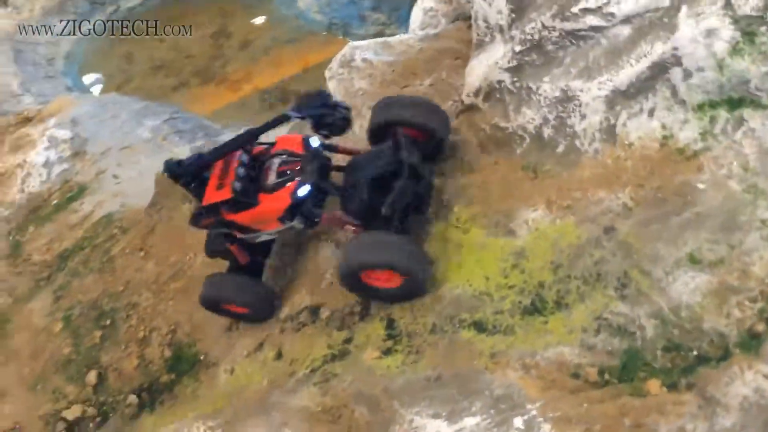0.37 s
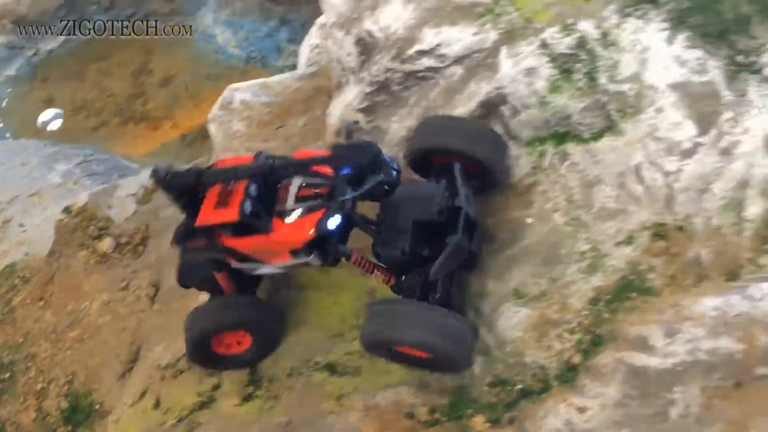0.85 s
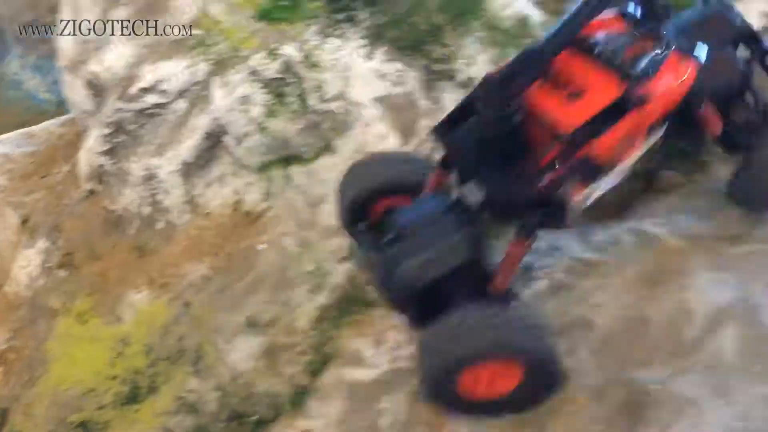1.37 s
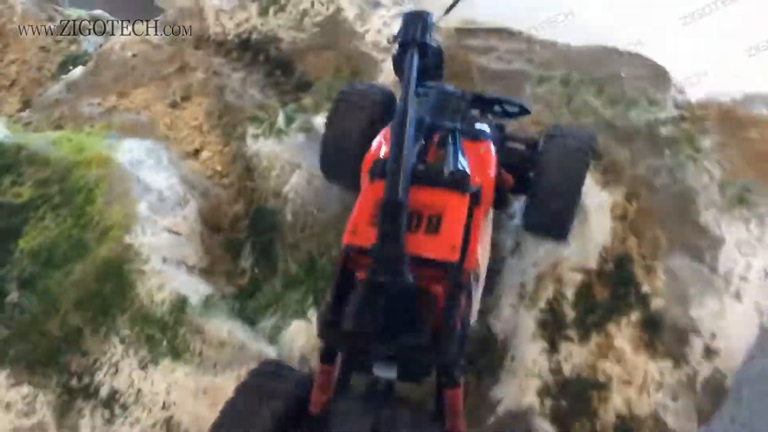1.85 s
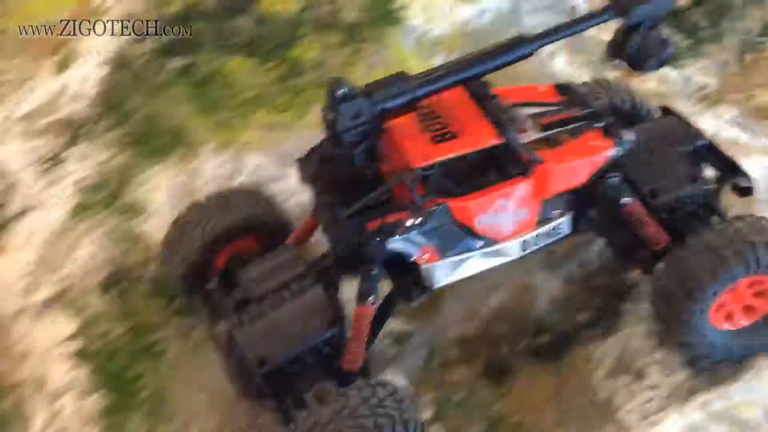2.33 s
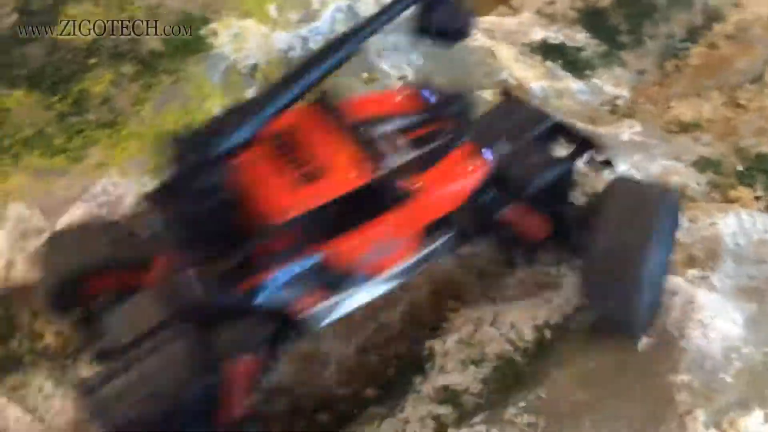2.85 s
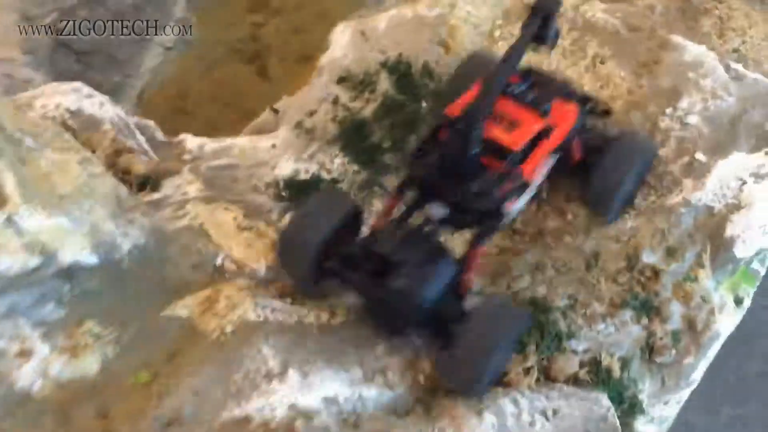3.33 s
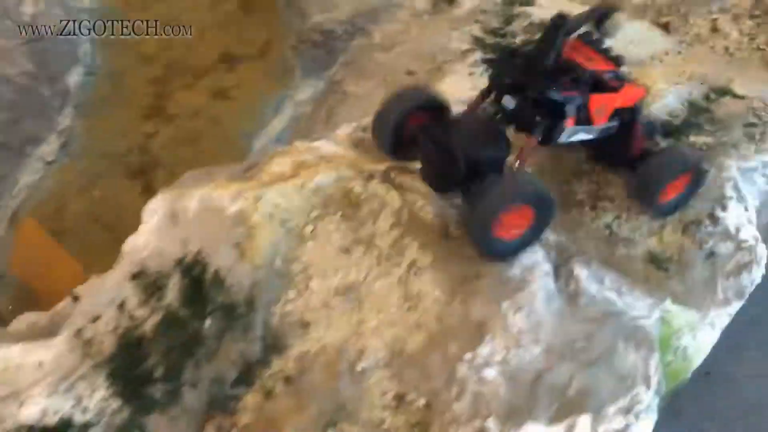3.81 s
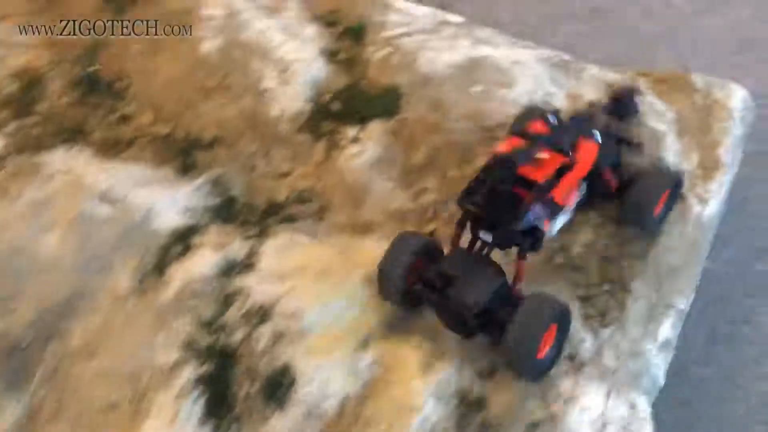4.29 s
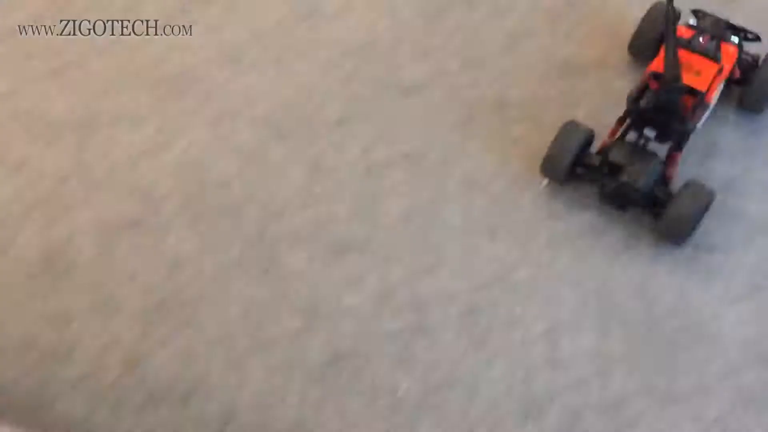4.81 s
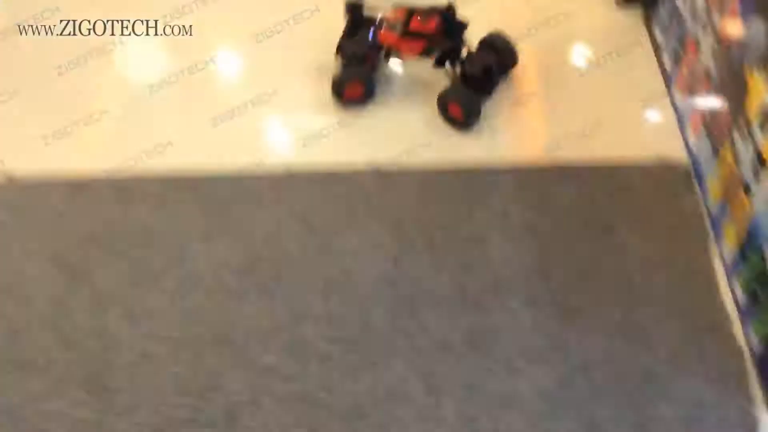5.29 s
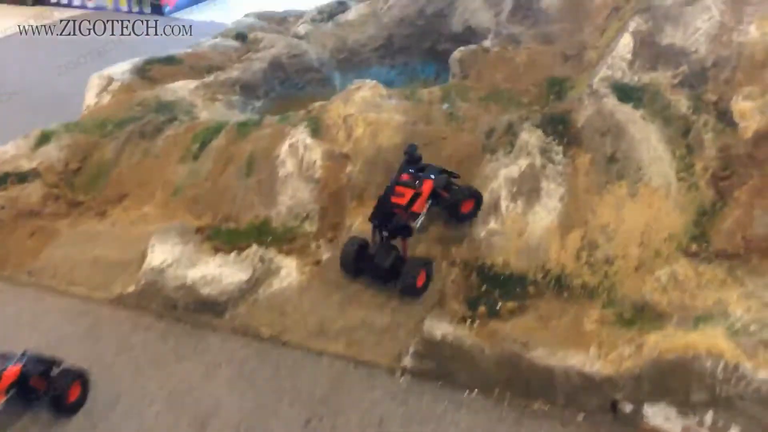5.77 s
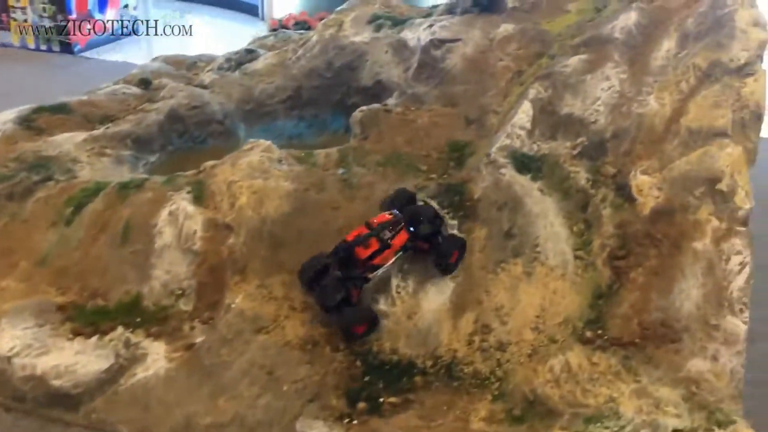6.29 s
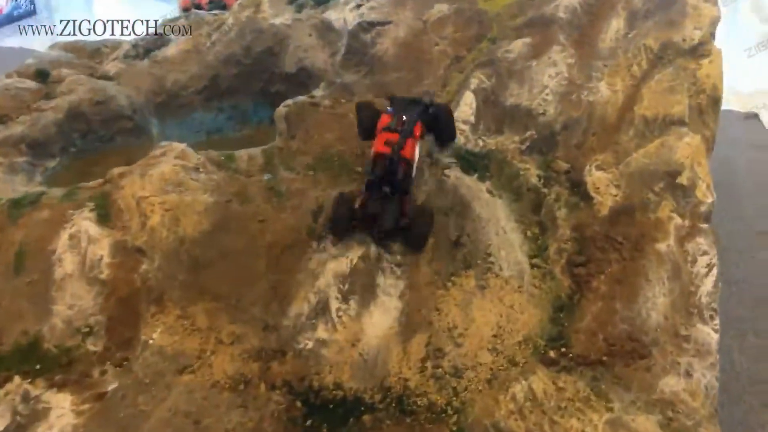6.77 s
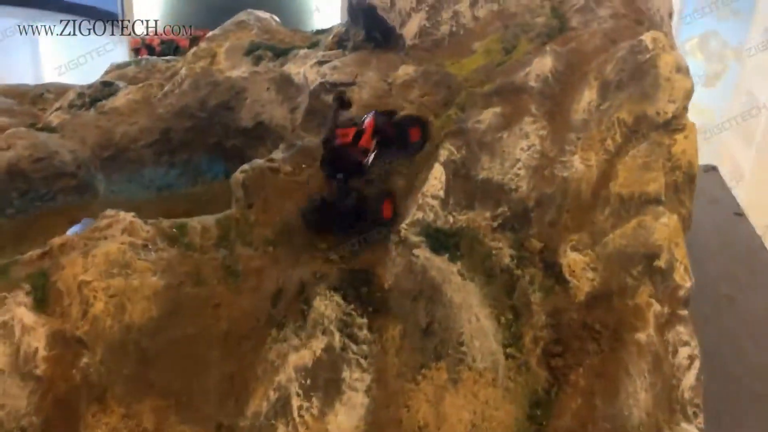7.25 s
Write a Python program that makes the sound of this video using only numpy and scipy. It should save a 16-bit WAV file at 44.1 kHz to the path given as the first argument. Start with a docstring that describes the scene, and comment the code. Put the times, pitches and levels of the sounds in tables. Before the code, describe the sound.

A toy vehicle's geared motor grinds and chirps in uneven spurts, heard close indoors with slight room reverberation. Knobbly tyres patter, thud and clack against a hollow plastic-like shell, busiest in the middle. One sharp, heavy bang lands past halfway, then the wheels hum across the floor, a tiny dropout passes, and gears whine upward again over faint air noise.

```python
"""Indoors, close to a phone, a small toy crawler climbs a hollow model rock.
Plastic gears rattle as filtered random impacts and sing in short tones gliding at the tooth rate.
Knobbly tyres rumble and knock, exciting damped resonances of the hollow shell and the chassis.
A diffuse room tail and a faint noise of air lie behind; the level dips once for a moment."""
import sys
import numpy as np
from scipy import signal
from scipy.fft import rfft, irfft
from scipy.io import wavfile
from scipy.ndimage import uniform_filter1d

SR = 44100
rng = np.random.default_rng(int(sys.argv[2]) if len(sys.argv) > 2 else 0)


def voltage_ratio(decibels):
    """Convert decibels (scalar or array-like) to amplitude ratios, 20 dB per decade."""
    exponent = np.asarray(decibels, float) / 20
    return 10 ** exponent


def wav_out(sig):
    """Save sig, one row per channel (or a flat mono array), as 16-bit PCM at SR to the path in sys.argv[1]."""
    wavfile.write(sys.argv[1], SR, np.round(np.clip(np.atleast_2d(sig).T, -1, 1) * 32767).astype(np.int16))


N = 325325

# harmonics of a tooth-rate tone: multiple, relative_db
OVERTONES = [(1, 0), (2, -2), (3, -2)]
# resonances of the hollow shell: centre_hz, width_hz, relative_db
SHELL_MODES = [(170, 85, -5), (222.5, 42, 3), (314, 146, -2)]
# resonances of the chassis: centre_hz, width_hz, relative_db
CHASSIS_MODES = [(413, 113, -7), (540, 108, 3), (707, 320, 1.5), (884, 150, 4), (1235, 650, -6)]


def level(x, db):
    """Normalisation: scales a signal to a given rms level."""
    return x * voltage_ratio(db) / np.sqrt(np.mean(x ** 2))


def colour(x, points):
    """Minimum-phase filtering: a folded cepstrum makes a causal filter from (Hz, dB) points."""
    hz, db = np.transpose(points)
    bin_hz = np.arange(1025) * SR / 2048
    log_gain = np.interp(np.log(bin_hz + 1), np.log(hz), db) * np.log(10) / 20
    cepstrum = irfft(log_gain)
    cepstrum[1:1024] *= 2
    cepstrum[1025:] = 0
    impulse = irfft(np.exp(rfft(cepstrum)))
    return signal.fftconvolve(x, impulse)[:len(x)]


def ring(x, modes):
    """Modal superposition: damped resonances in parallel, with alternating sign."""
    out = 0
    for k, (hz, width_hz, db) in enumerate(modes):
        resonator = signal.iirpeak(hz, hz / width_hz, SR)
        out = out + (-1) ** k * voltage_ratio(db) * signal.lfilter(*resonator, x)
    return out


def walk(rate_hz):
    """Band-limited fluctuation: held random levels, smoothed twice, with a spread near 1."""
    hold = int(SR / rate_hz)
    steps = np.repeat(rng.standard_normal(N // hold + 1), hold)
    return 1.3 * uniform_filter1d(uniform_filter1d(steps, hold), hold)[:N]


def grains(rate_hz, spread_db):
    """Shot noise: random tiny impacts, a few much harder than the rest."""
    hit = rng.random(N) < rate_hz / SR
    return hit * rng.standard_normal(N) * voltage_ratio(spread_db * rng.exponential(size=N))


def gears(box_db, pinion_db, hiss_db):
    """Impact excitation: loose teeth tick and rasp, brushes hiss, and the same jolts shake all."""
    # spectra of housing, pinion, rasp and brushes: frequency_hz, relative_db
    box_curve = [(250, -73.5), (560, -24), (900, -8), (1300, -5.5), (1470, -3), (1990, 0.5), (2700, -5),
                 (3510, -33), (5940, -120)]
    pinion_curve = [(700, -64), (1590, -29), (2700, 1), (3580, -1), (4920, -9), (5460, -10), (8000, -25),
                    (10400, -28), (17600, -120)]
    rasp_curve = [(3500, -30), (5000, -5), (5700, 0), (7000, -2), (8500, -6), (10500, -26)]
    hiss_curve = [(500, -50), (2000, -14), (4120, 1.5), (7000, 0.5), (7750, -1.5), (12800, -3), (14900, -6),
                  (15700, -6.5)]
    # swelling and fading of the gritty rasp: time_s, db_over_pinion_ticks
    rasp_swell = [(0, -16), (2.3, -20), (2.5, 0), (2.65, -2.5), (2.8, -10), (4.4, -14), (5.3, -29),
                  (6.15, -12), (6.3, -27), (6.72, -18), (6.85, -31), (7.38, -15)]

    jolt_db = 0.5 * walk(30) + 2.0 * walk(110)
    ticks = grains(9000, 0.98)
    box_chirps = voltage_ratio(-5.5) * chirps(count=450, low_hz=1099.0, high_hz=2739)
    box = level(colour(ticks, box_curve), 0) + box_chirps
    pinion_chirps = voltage_ratio(-7.0) * chirps(count=900, low_hz=2700, high_hz=6516)
    rasp_db = np.interp(np.arange(N) / SR, *np.transpose(rasp_swell)) + walk(40)
    rasp = level(colour(grains(5000, 1.3), rasp_curve), 0) * voltage_ratio(rasp_db)
    pinion = level(colour(ticks, pinion_curve), 0) + pinion_chirps + rasp
    hiss = level(colour(grains(12000, 0.93), hiss_curve), 0) * voltage_ratio(1.03 * walk(27))
    rattle = box * voltage_ratio(box_db - 5.0) + pinion * voltage_ratio(pinion_db - 1.5)
    return voltage_ratio(jolt_db) * (rattle + hiss * voltage_ratio(hiss_db + 3.0))


def chirps(count, low_hz, high_hz):
    """Frequency modulation: loose gear pairs catch briefly, giving short, mostly falling tones."""
    out = np.zeros(N + SR)
    for when, pitch, length, bend in rng.random((count, 4)):
        u = np.linspace(0, 1, int((0.01 + 0.022 * length) * SR))
        start_hz = low_hz * (high_hz / low_hz) ** pitch
        hz = start_hz * (1 + (0.355 * bend - .25) * u)
        i = int(when * N)
        out[i:i + len(u)] += np.sin(np.pi * u) * np.sin(2 * np.pi * np.cumsum(hz) / SR)
    return level(out[:N], 0)


def whine():
    """Source and filter: gear glides, tread hum and a steady tone pass through the housing."""
    # what the case lets out: frequency_hz, gain_db
    housing = [(2800, 0), (3750, 0), (4800, -10), (5500, -1), (6400, -14)]
    wobble = .01 * walk(80) + .015 * walk(200)
    # complex noise frays each harmonic, faster for the higher ones
    rough = np.array([.36 * (walk(170 * k ** 2) + 1j * walk(170 * k ** 2)) for k, _ in OVERTONES])
    tones = gear_glides(wobble, rough) + tread_hum(wobble, rough) + strain_tone(wobble, rough)
    return colour(tones, housing)


def gear_glides(wobble, rough):
    """Tooth-meshing frequency: pitch rises as a motor spins up and falls as it loads."""
    # glides, levels ahead of the housing: start_s, length_s, from_hz, to_hz, level_db
    glides = [(0.087, 0.062, 800, 1240, -26.5), (0.137, 0.042, 1146, 1360, -26),
              (0.532, 0.08, 2310, 2350, -31), (0.274, 0.018, 2660, 2250, -25),
              (0.342, 0.03, 1850, 2150, -34), (0.105, 0.074, 1750, 2080, -26),
              (0.163, 0.022, 2110, 2100, -27), (0.189, 0.017, 2060, 1860, -23.5),
              (0.201, 0.03, 2064, 1500, -23), (0.252, 0.051, 1820, 992, -27.5),
              (0.268, 0.023, 2280, 1880, -30), (0.313, 0.029, 2400, 1840, -22.5),
              (0.371, 0.044, 2175, 1960, -20.5), (0.409, 0.023, 1995, 2040, -27),
              (0.464, 0.022, 1834, 1290, -22.5), (0.497, 0.038, 2415, 2023, -22),
              (0.534, 0.027, 1500, 1280, -24), (0.601, 0.021, 2334, 1500, -21.5),
              (0.65, 0.03, 1644, 1000, -26), (0.695, 0.034, 2450, 2036, -19.5),
              (0.728, 0.04, 2040, 2210, -32), (0.814, 0.038, 1884, 1540, -30),
              (0.851, 0.022, 1500, 1680, -24), (0.877, 0.046, 1640, 1430, -31),
              (0.865, 0.04, 2260, 1850, -28), (0.93, 0.064, 1860, 1803, -17.5),
              (1.022, 0.05, 2150, 2030, -24.5), (1.064, 0.03, 1720, 1525, -26),
              (1.122, 0.041, 2230, 2370, -27), (1.167, 0.029, 1730, 1520, -27),
              (1.253, 0.056, 1880, 2105, -23), (1.333, 0.036, 2590, 2480, -26.5),
              (1.372, 0.027, 2540, 2050, -28), (1.818, 0.042, 700, 1005, -39),
              (1.886, 0.029, 1160, 1400, -25), (1.901, 0.037, 1677, 1677, -20.5),
              (1.956, 0.024, 2060, 1675, -22.5), (2.394, 0.016, 1670, 1710, -26),
              (2.373, 0.023, 3300, 3180, -33), (2.713, 0.018, 2025, 2200, -26.5),
              (2.725, 0.015, 1040, 1310, -24.5), (2.736, 0.017, 1556, 1390, -23),
              (2.752, 0.02, 1300, 1086, -26), (2.741, 0.036, 3030, 2220, -23),
              (2.88, 0.021, 2040, 2130, -24.5), (3.217, 0.017, 2010, 2110, -24.5),
              (3.665, 0.032, 2000, 1800, -31), (3.571, 0.047, 1263, 1332, -24),
              (3.609, 0.025, 1360, 1800, -23.5), (3.626, 0.038, 1790, 1890, -22),
              (4.063, 0.04, 1393, 1337, -29), (4.171, 0.051, 1740, 1900, -29.5),
              (4.212, 0.048, 2150, 2530, -22), (5.2, 0.023, 3600, 3600, -27),
              (5.226, 0.039, 3820, 3570, -27), (5.308, 0.083, 1433, 2200, -29),
              (5.386, 0.056, 2130, 2230, -24.5), (5.431, 0.049, 2350, 2550, -23.5),
              (5.468, 0.039, 2580, 3100, -29), (5.519, 0.06, 3130, 3020, -32),
              (5.551, 0.019, 2324, 1850, -22), (5.568, 0.022, 1860, 2320, -23),
              (5.621, 0.044, 2860, 2640, -32.5), (5.671, 0.016, 2350, 2200, -27),
              (5.739, 0.026, 3110, 2500, -26.5), (5.754, 0.019, 1936, 1760, -25),
              (5.77, 0.033, 1780, 2240, -29), (5.8, 0.032, 2170, 2400, -27),
              (5.833, 0.036, 2220, 1796, -27), (5.889, 0.032, 1570, 1250, -32.5),
              (5.921, 0.013, 1990, 1700, -32), (2.232, 0.022, 2040, 1850, -31.5),
              (6.167, 0.035, 1164, 1350, -30.5), (6.168, 0.025, 1570, 1495, -27.5),
              (6.193, .014, 2170, 2080, -30), (6.213, 0.023, 3760, 3800, -29),
              (6.222, .016, 1850, 1730, -26), (4.422, 0.032, 3400, 3680, -32),
              (6.242, 0.033, 1147, 1870, -27.5), (6.27, 0.049, 1900, 1670, -23.5),
              (6.315, 0.042, 1714, 1890, -21), (6.36, 0.071, 1923, 1864, -21),
              (6.429, 0.067, 1880, 1920, -35), (6.463, 0.05, 2730, 2660, -28),
              (6.534, 0.025, 3150, 2650, -22), (6.553, 0.02, 2540, 2340, -20.5),
              (6.576, 0.028, 2510, 2440, -22.5), (6.57, 0.035, 2850, 3020, -28),
              (6.593, 0.025, 1855, 1820, -22), (6.629, 0.024, 2170, 2020, -21),
              (6.648, 0.022, 2040, 2240, -22), (6.671, 0.045, 1920, 1836, -20.5),
              (6.28, 0.024, 820, 964, -26.5), (7.256, 0.031, 800, 1050, -29),
              (6.885, 0.017, 1285, 1150, -27), (6.922, 0.02, 664, 630, -28), (6.965, 0.03, 1390, 1500, -31),
              (6.986, 0.064, 1219, 1578, -23.5), (7.026, 0.046, 1520, 1980, -27),
              (7.084, 0.046, 2430, 2650, -30), (7.123, 0.033, 2660, 2140, -25.5),
              (7.063, 0.047, 1890, 2055, -28), (7.161, 0.042, 2330, 2710, -27),
              (7.185, 0.043, 2420, 2330, -26.5), (7.24, 0.042, 3000, 3170, -27.5)]
    db_per_octave = 2  # faster teeth sing louder
    out = np.zeros(N)
    for start, length, from_hz, to_hz, db in glides:
        # a loaded motor drops fast, then settles
        halfway = .62 if to_hz < from_hz else .5
        half_hz = from_hz + (to_hz - from_hz) * halfway
        # a freely climbing pitch keeps half of the wobble and fraying
        loose = .5 if to_hz > 1.1 * from_hz else 1
        swing_db = db_per_octave * np.log2(to_hz / from_hz) / 2
        times = start + length * np.array([0, .5, 1])
        levels_db = [db - swing_db, db, db + swing_db]
        out += sing(times, [from_hz, half_hz, to_hz], levels_db, loose * wobble, loose * rough)
    return out


def tread_hum(wobble, rough):
    """Periodic contact: tread knobs hum over the flat floor at their passing rate."""
    # rolling hum, levels ahead of the housing: time_s, knob_rate_hz, level_db
    roll = [(4.535, 540, -37), (4.63, 560, -33.5), (4.72, 540, -37), (4.772, 500, -57), (4.949, 420, -46),
            (5.101, 430, -42), (5.27, 504, -43)]
    return sing(*np.transpose(roll), 3 * wobble, 2 * rough)


def strain_tone(wobble, rough):
    """Near-constant periodicity: a thin steady tone, perhaps the motor straining on the rock."""
    # steady tones, levels ahead of the housing: start_s, end_s, pitch_hz, level_db
    strains = [(6.004, 6.193, 2930, -39.5), (7.331, 7.37, 2930, -32)]
    out = np.zeros(N)
    for start, end, hz, db in strains:
        out += sing([start, end], [hz, hz], [db, db], .1 * wobble, .3 * rough)
    return out


def sing(s, hz, db, wobble, rough):
    """Amplitude and phase modulation: speed wobbles, an off-centre pinion throbs, wear frays."""
    pinion_teeth, fade_s = 9, 0.0032
    i = np.arange(int(s[0] * SR), min(int(s[-1] * SR), N))
    phase = 2 * np.pi * np.cumsum(np.interp(i / SR, s, hz) * (1 + wobble[i])) / SR
    fade = np.clip(np.minimum(i - i[0], i[-1] - i) / SR / fade_s, 0, 1)
    throb = 1 + .3 * np.cos(phase / pinion_teeth)  # once a turn
    tone = 0
    for k, over_db in OVERTONES:
        frayed = 1 / k ** 3 + rough[k - 1, i]
        tone = tone + voltage_ratio(over_db) * np.real(frayed * np.exp(1j * k * phase))
    out = np.zeros(N)
    out[i] = voltage_ratio(np.interp(i / SR, s, db)) * fade * throb * tone
    return out


def tyres(boom_db, rumble_db, patter_db):
    """Forced resonance: tread knobs drum the ground and shell and patter through the chassis."""
    # resonances of the ground: centre_hz, width_hz, relative_db
    ground = [(50, 34, -10.5), (90, 33, -1), (138.5, 43, 0)]
    knobs = grains(700, 1.2) * voltage_ratio(1.9 * walk(25))
    small_knobs = grains(1500, 1.73) * voltage_ratio(2.0 * walk(25))
    # a second, broad resonance shapes each layer
    boom = ring(ring(knobs, ground), [(98, 360, 0)])
    rumble = ring(ring(knobs, SHELL_MODES), [(221, 215, 0)])
    patter = ring(ring(small_knobs, CHASSIS_MODES), [(766, 2200, 0)])
    drumming = level(boom, 0) * voltage_ratio(boom_db) + level(rumble, 0) * voltage_ratio(rumble_db)
    return drumming + level(patter, 0) * voltage_ratio(patter_db)


def knocks():
    """Contact stiffness: a hard blow cracks, a middling one chatters, a soft one rings the shell."""
    # tyres and chassis striking the shell:
    # time_s, relative_force_db, hardness (0 rubber, 1 plastic edge), tyre_bounce_hz
    strikes = [(0.457, -14.5, 0.85, 203), (0.703, -14.5, 0.51, 268), (1.333, -10.5, 0.9, 390),
               (1.413, -22.5, 0.51, 266), (1.509, -22, 0.45, 270), (1.778, -58, 0.93, 102),
               (1.817, -37, 0.83, 215), (1.937, -15, 1, 382), (2.013, -23, 0.51, 314),
               (2.18, -26, 0.34, 345), (2.324, -24, 0.99, 200), (2.372, -27, 0.94, 205),
               (2.419, -23, 0.94, 200), (2.422, -28, 0.18, 155), (2.658, -22, 0.56, 153),
               (2.72, -22.5, 0.32, 178), (2.859, -8, 0.3, 606), (2.864, -11, 0.11, 153),
               (2.891, -23.5, 0.01, 170), (2.915, -17, 0.19, 240), (2.938, -21.5, 0.12, 170),
               (2.981, -12, 0.66, 347), (2.989, -15, 0.71, 347), (3.028, -17.5, 1, 200),
               (3.116, -10.5, 0.93, 200), (3.272, -23, 0.48, 177), (3.336, -19.5, 0.58, 210),
               (3.578, -41, 1, 366), (3.693, -31, 0, 238), (3.775, -15, 0.35, 76), (3.807, -14, 0.83, 202),
               (3.889, -10, 0.89, 258), (3.966, -10, 0.72, 75.4), (3.988, -15.5, 0.73, 200),
               (4.014, -16, 0.89, 200), (4.347, -11, 0.92, 200), (4.356, -16.5, 0.098, 270),
               (4.357, -11.5, 0.76, 278), (4.363, -6, 0.92, 200), (4.369, -20.5, 0.22, 239),
               (4.387, -22.5, .5, 300), (4.509, -15, 0.93, 400), (4.518, -15, 0.11, 257),
               (4.518, -10.5, 0.11, 516), (4.514, 4, 0.95, 232), (4.528, -12, 0.64, 399),
               (4.546, -30, 0.13, 500), (4.648, -10.5, 0.66, 145), (4.663, -13, 1, 186),
               (4.715, -12.5, 0.84, 316), (4.972, -23, 0.32, 202), (5.922, -29, 0.008, 200),
               (5.99, -36, 0, 104), (6.08, -29.5, 0.011, 158), (6.171, -25.5, 0.18, 149),
               (6.203, -28, 0.096, 152), (6.428, -25.5, 0.16, 151), (6.468, -21, 0.16, 332),
               (6.55, -20, 0.67, 129), (6.648, -34, .5, 300), (6.704, -29, 0.073, 287),
               (6.891, -11.5, 0.87, 110)]
    # spectrum of cracking plastic: frequency_hz, relative_db
    crack_curve = [(710, -14), (1200, -1.5), (2130, -5.5), (2450, 1.5), (3660, -1.5), (4960, -13),
                   (7570, -15), (16000, -26)]
    contact_db = 36  # each part fades by this much a unit of hardness away from its own
    t = np.arange(int(.08 * SR)) / SR
    out = np.zeros(N + len(t))
    noises = rng.standard_normal((len(strikes), 2, len(t)))
    for (s, force_db, hard, bounce_hz), noise in zip(strikes, noises):
        mismatch = abs(np.clip(hard, 0, 1) - np.array([0, .5, 1]))
        thud_db, clack_db, crack_db = force_db - contact_db * mismatch
        bounce = np.sin(2 * np.pi * bounce_hz * t) * t * np.exp(-t * bounce_hz / 0.38)
        thud = bounce + voltage_ratio(11) * ring(bounce, SHELL_MODES)
        clack = ring(t * np.exp(-t / 0.0041) * noise[0], CHASSIS_MODES)
        # more forceful blows crack for longer
        decay_s = 0.0012 + 0.004 * voltage_ratio(force_db)
        crack_envelope = (1 - np.exp(-t / 0.00054)) * np.exp(-t / decay_s)
        crack = colour(crack_envelope * noise[1], crack_curve)
        blow = level(thud, thud_db - 5.5) + level(clack, clack_db - 11.5) + level(crack, crack_db - 20.0)
        out[int(s * SR):int(s * SR) + len(t)] += blow
    return out[:N]


def controls(t):
    """Common drive: the strongest stretch of throttle rules each layer; ground and lurches add."""
    # steady throttle: up_to_speed_s, throttle_off_s, start_rattle_db, end_rattle_db, brightness_db
    runs = [(0.001, 0.186, -34.5, -26, -2.5), (0.2, 0.93, -29.5, -28, 0.5), (0.902, 1.384, -30, -29.5, 3),
            (1.397, 1.566, -32.5, -32.5, 0), (1.783, 1.81, -50, -46, -23), (1.821, 1.859, -36.5, -28, -18),
            (1.874, 1.967, -32.5, -32.5, 2), (2.038, 2.2, -32, -39, -1), (2.21, 2.287, -35.5, -39, -18),
            (2.324, 2.37, -34.5, -43, 1.5), (2.369, 2.698, -35, -33, 4), (2.708, 3.07, -28, -36.5, 0.5),
            (3.075, 3.386, -33, -34, 1), (3.406, 3.508, -37.5, -39, -17), (3.583, 3.891, -31.5, -34, 0.5),
            (3.954, 4.148, -40.5, -33.5, -1.5), (4.18, 4.425, -31, -32.5, 1.5),
            (4.443, 4.626, -32.5, -37.5, 0.5), (4.639, 4.995, -33, -33.5, 0),
            (4.992, 5.265, -34.5, -30.5, 2), (5.322, 5.862, -31.5, -33, -0.5),
            (5.888, 6.15, -35.5, -36.5, -0.5), (6.156, 6.36, -32, -28, -2.5),
            (6.33, 6.722, -30, -30.5, 0.5), (6.746, 6.896, -32, -42, -4.5), (6.87, 7.072, -36.5, -28.5, -4),
            (7.112, 7.38, -29.5, -33.5, 0.5)]
    # how each layer follows the motor:
    # db_over_rattle, db_lost_per_db_of_lost_speed, db_gained_per_db_of_brightness
    follow = {"box": (2.1, 0.82, -0.22), "pinion": (0.05, 0.88, 0.064), "hiss": (-10, 1.03, 1.59),
              "boom": (-15.5, 0.39, -0.077), "rumble": (-11, 0.95, 0.059), "patter": (-7, 0.63, -0.18)}
    # ground under the wheels: time_s, tread_bite_db, hollowness_db
    surface = [(0.0, -2, 10), (0.7, 3.5, -0.5), (1.1, 3.5, 0), (1.5, 2, -1), (1.9, -3.5, -5.5), (2.3, 1, 2),
               (2.46, -4, -2), (2.64, -11, -11), (2.7, -5, 6), (2.9, 6, 2), (3.3, 6, -3), (3.6, -3.5, -3),
               (3.72, -1, 6), (3.93, 8, -10.5), (4.1, 1.5, -3), (4.4, 4.5, -5), (4.72, -2.5, -14.5),
               (5.45, -4, -12), (5.6, -0.5, -0.5), (5.85, 3.5, -7), (6.1, -4, 11), (6.45, -1.5, -2),
               (6.8, -1.5, 5.5), (7.05, -1.5, -4), (7.38, 3, 8.5)]
    # lurches over bumps: time_s, half_length_s, gears_db, treads_db
    lurches = [(0.464, 0.013, 2, -11), (0.712, 0.016, -2, 4.5), (0.955, 0.029, 5.5, -0.5),
               (1.904, 0.035, 2, 3), (1.956, 0.041, 4, 12.5), (2.406, 0.028, 6, 0),
               (2.768, 0.038, 3.5, -0.5), (2.915, 0.068, 2, 4), (3.134, 0.061, 1, 6.5),
               (3.364, 0.01, 9, 14.5), (3.784, 0.046, 3.5, 12.5), (3.888, 0.044, 3.5, 7.5),
               (3.987, 0.058, 3.5, 10), (4.356, 0.051, 7, 0.5), (4.526, 0.015, 14.5, 12),
               (4.655, 0.034, 10, 15.5), (4.85, 0.03, 2, -3), (5.126, 0.016, 3, -1),
               (4.726, 0.035, 3.5, 12.5), (5.559, 0.017, 2.5, 5.5), (6.507, 0.076, 0, 7.5)]
    # shell resonance, varying with its thickness along the way: time_s, rumble_gain_db
    shell_gain = [(0.0, -9), (1.9, 0), (2.3, -3), (4.6, 1.5), (7.0, -2), (7.38, -10)]
    spin_up_db_per_s, coast_db_per_s = 794, 179
    boom_per_hollow, rumble_per_hollow = 0.91, 0.75

    on, off, start_db, end_db, bright_db = np.transpose(runs)[:, :, None]
    rattle_db = start_db + (end_db - start_db) * np.clip((t - on) / (off - on), 0, 1)
    lost_db = spin_up_db_per_s * np.maximum(on - t, 0) + coast_db_per_s * np.maximum(t - off, 0)
    db = {}
    for layer, (over, slow, tilt) in follow.items():
        db[layer] = np.max(rattle_db + over - slow * lost_db + tilt * bright_db, axis=0)

    s, bite_db, hollow_db = np.transpose(surface)
    bite_db, hollow_db = np.interp(t, s, bite_db), np.interp(t, s, hollow_db)
    s, half, gear_db, tread_db = np.transpose(lurches)[:, :, None]
    bump = np.exp(-((t - s) / half) ** 2)
    gear_db = (gear_db * bump).sum(axis=0)
    tread_db = bite_db + (tread_db * bump).sum(axis=0)

    boom_db = db["boom"] + tread_db + boom_per_hollow * hollow_db
    rumble_db = db["rumble"] + tread_db + rumble_per_hollow * hollow_db
    rumble_db = rumble_db + np.interp(t, *np.transpose(shell_gain))
    gear_levels = [db[layer] + gear_db for layer in ("box", "pinion", "hiss")]
    return gear_levels, [boom_db, rumble_db, db["patter"] + tread_db]


def room(x):
    """Diffuse reverberation: a short, dull, exponentially decaying tail from floor and walls."""
    t60_s, tail_db, delay_s = .45, -16, .006
    t = np.arange(int(.4 * SR)) / SR
    decay = np.exp(-np.log(1000) * t / t60_s) * (t > delay_s)
    tail = ring(rng.standard_normal(len(t)) * decay, [(1500, 7000, 0)])
    return signal.fftconvolve(x, voltage_ratio(tail_db) * tail / np.linalg.norm(tail))[:N]


def air():
    """Stationary noise: filtered white noise gives the faint background."""
    # spectrum of the air: frequency_hz, relative_db
    air_curve = [(15, -57), (25, 0), (97, 3.5), (129, -15), (157, -1), (770, -18), (1110, -48), (2120, -25),
                 (8000, -63), (10400, -80), (17600, -120)]
    return level(colour(rng.standard_normal(N), air_curve), -56.5)


def scene():
    """Superposition: crawler, room and air add to a middle signal, with a faint side signal."""
    # brief dip in level: start_s, end_s, gain_db
    dip_start, dip_end, dip_db = (5.272, 5.293, -24)
    t = np.arange(N) / SR
    coarse_t = np.arange(0, N / SR, .001)
    gear_db, tyre_db = ([np.interp(t, coarse_t, db) for db in group] for group in controls(coarse_t))
    crawler = gears(*gear_db) + tyres(*tyre_db) + knocks()
    song = whine()
    mid = crawler + song + room(crawler + .5 * song) + air()
    mid = mid * voltage_ratio(dip_db * ((t > dip_start) & (t < dip_end)))
    # a faint, patchy side signal, mostly treble with a little lowest bass
    side_curve = [(30, -27), (70, -39), (130, -48), (1000, -42.0), (2000, -47.0),
                  (5000, -31.5), (9000, -18.5), (14000, -15.0)]
    side = colour(np.roll(mid, 700) * voltage_ratio(7.4 * walk(25)), side_curve)
    return np.array([mid + side, mid - side])


def top_cut(x):
    """Nothing passes above the cut-off."""
    return signal.sosfilt(signal.butter(12, 16890, fs=SR, output="sos"), x)


def record(dry):
    """Saturation and low-pass filtering: the phone rounds the loudest peaks and cuts the top."""
    top_hz = 15800
    rounded = np.tanh(1.08 * dry) / 1.08
    low_pass = signal.ellip(10, .2, 80, top_hz, fs=SR, output="sos")
    finished = signal.sosfilt(low_pass, rounded)
    return top_cut(finished)


dry = scene()
out = record(dry)
wav_out(out)
```